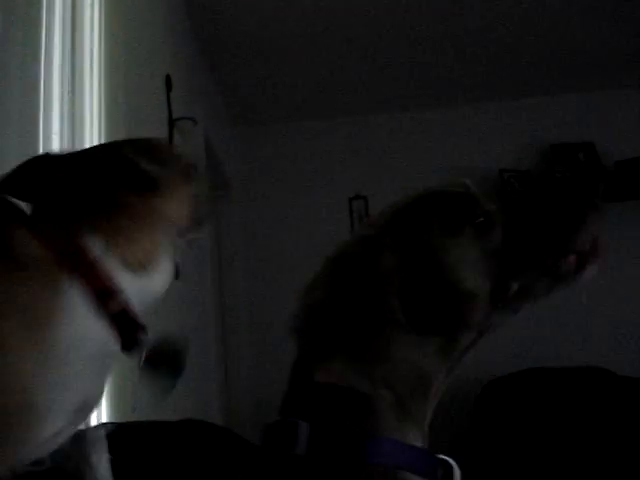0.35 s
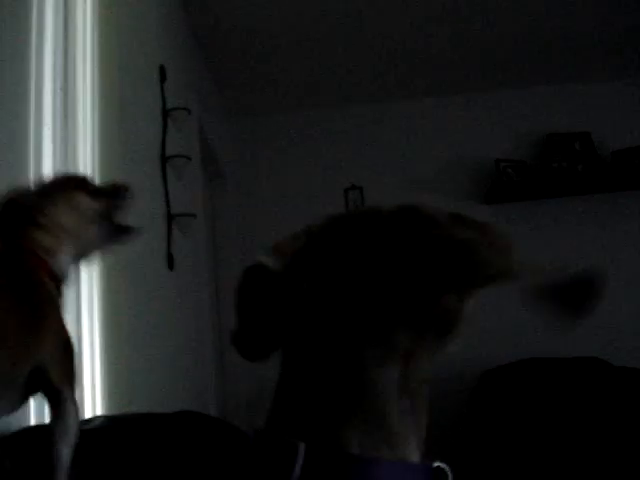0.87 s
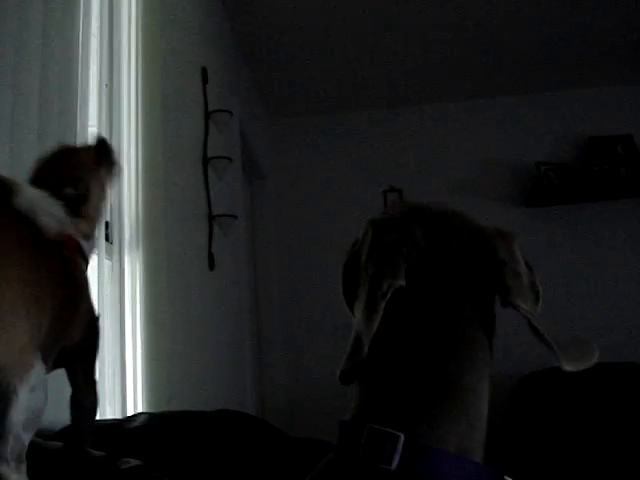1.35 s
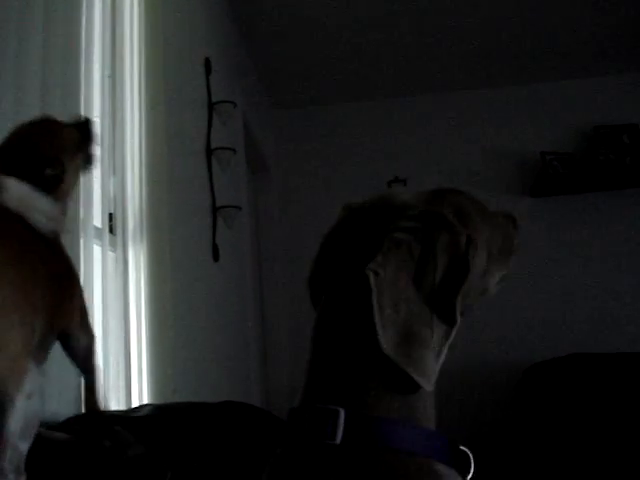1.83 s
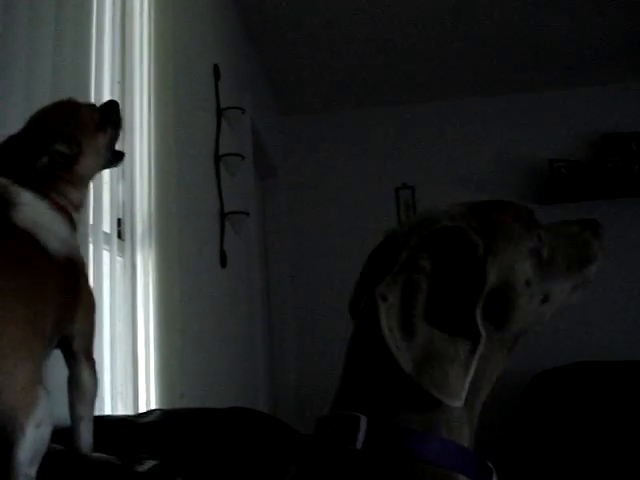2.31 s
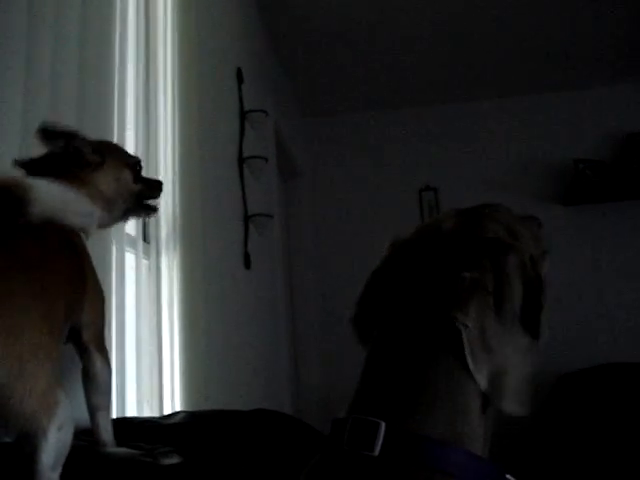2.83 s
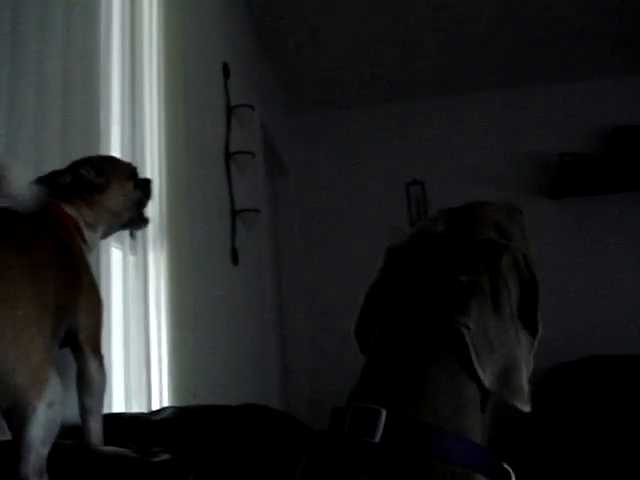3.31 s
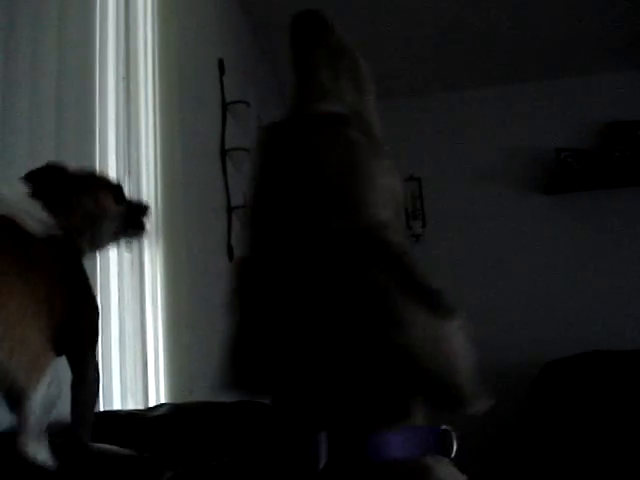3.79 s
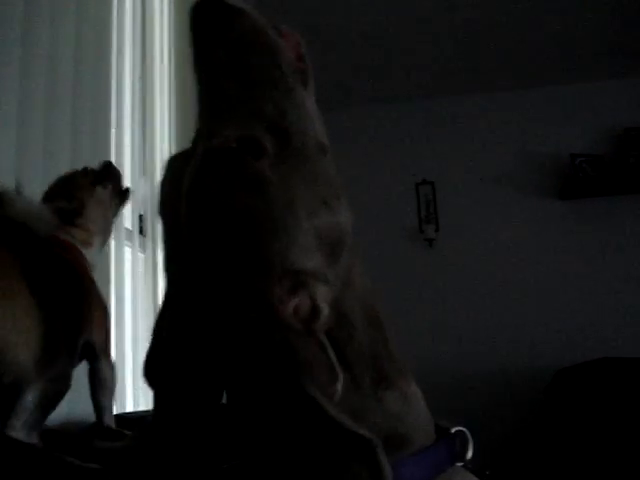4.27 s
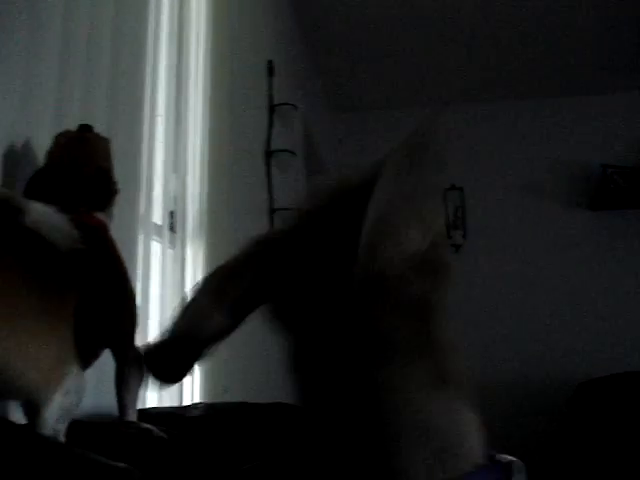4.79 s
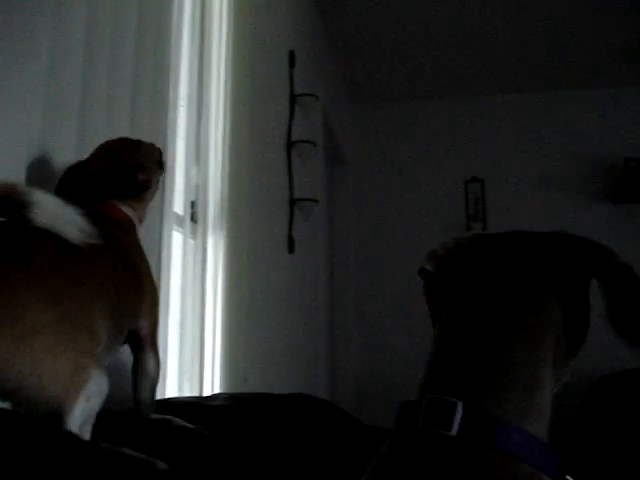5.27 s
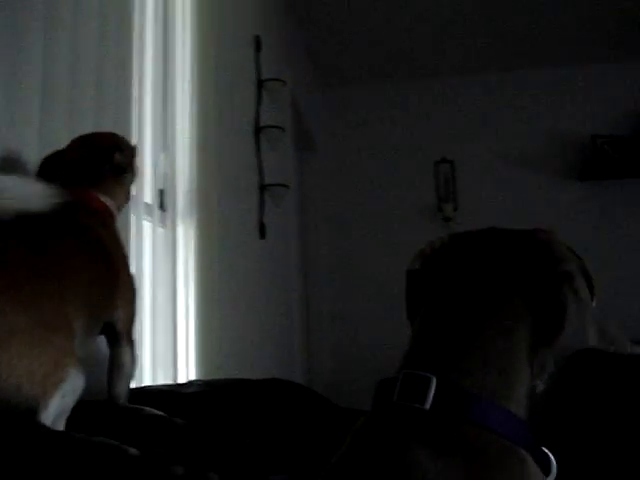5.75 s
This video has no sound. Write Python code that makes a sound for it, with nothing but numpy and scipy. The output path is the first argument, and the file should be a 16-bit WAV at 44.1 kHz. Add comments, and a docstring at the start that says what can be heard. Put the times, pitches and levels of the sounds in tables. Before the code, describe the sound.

Excited dogs indoors, close to a small device with little bass and a crunchy overload. Piercing yips and sliding whines run throughout; hoarse mid-pitched barks come between them, with a few faint yelps from another dog. A wavering howl rises, holds and drops, leaving falling whines and a late short bark over room echo.

```python
"""In a ringing room a small dog yips and whines: a nearly pure high tone with fluttering overtones and breath.
A large dog barks in short arches and howls once: a chest tone and throat-shaped overtones over a rasp.
A third dog yelps now and then: an unsteady stack of overtones picked out by its mouth resonance.
Echoes follow them all, and earlier yelps still ring at the start.
A small microphone cuts the bass and overloads, flattening the positive swing most."""
import sys
import numpy as np
from scipy import signal
from scipy.fft import rfft, irfft, next_fast_len
from scipy.io import wavfile
from scipy.ndimage import uniform_filter1d

SR = 44100
rng = np.random.default_rng(int(sys.argv[2]) if len(sys.argv) > 2 else 0)


def unload_audio(sound):
    """Save the sound as a 16-bit wav file, at the path given as the first command line argument."""
    columns = np.transpose(np.atleast_2d(sound))
    # keep every value between -1 and 1, then stretch to whole-number steps
    steps = np.round(np.clip(columns, -1, 1) * 32767)
    wavfile.write(sys.argv[1], SR, steps.astype(np.int16))


def linear_from_db(decibels):
    """Turn decibels (scalar or array-like) into linear amplitude factors; 0 gives 1."""
    return 10 ** (np.asarray(decibels, float) / 20)


N = 259308

# small dog, one list a call: time_s, pitch_hz, fundamental_level_db
SMALL_CALLS = [
    [(.054, 1000, -9), (.085, 1442, -11.5), (.115, 1563, -16.5), (.138, 1130, -5), (.175, 945.6, -44),
     (.25, 985, -7.5), (.278, 1055, -38.5), (.315, 1060, -8.5), (.345, 1108, -25), (.415, 815, -24.5)],
    [(.65, 806.4, -17.5), (.682, 1476, -10), (.72, 1450, -15), (.73, 1076, -5.5), (.92, 1000, -8.5),
     (.985, 989, -23.5), (1.04, 1018, -16.5), (1.1, 875, -21)],
    [(1.185, 786, -29), (1.22, 1088, -20.5), (1.228, 1190, -7.5), (1.29, 1135, -11.5), (1.35, 1056, -12.5),
     (1.39, 948, -15.5), (1.43, 880, -11)],
    [(1.69, 799.5, -40), (1.74, 937, -2.5), (1.8, 1007, -26.5), (1.845, 1057, -2), (1.905, 1003, -14.5),
     (1.97, 1032, -14), (2.03, 927.5, -8.5), (2.1, 890.5, -45)],
    [(2.11, 889.6, -13.5), (2.14, 918, -15), (2.32, 893.4, -16.5), (2.41, 909, -19.5), (2.47, 974, -10),
     (2.59, 943.4, -22), (2.63, 868, -19), (2.69, 897.6, -8.5), (2.745, 909, -35), (2.78, 1003, -29.5),
     (2.84, 980, -13), (2.93, 975, -34.5)],
    [(3.097, 590.5, -34), (3.125, 1092, -9.5), (3.19, 1059, -1), (3.25, 984, -19), (3.32, 929.3, -3),
     (3.47, 943.8, -13.5), (3.53, 993.3, -18), (3.585, 916, -14)],
    [(3.57, 911.7, -10.5), (3.603, 910, -20.5), (3.612, 1024, -24.5), (3.636, 1034, -40),
     (3.646, 1126, -12), (3.72, 1080, -11.5), (3.81, 1057, -18), (3.85, 998, -16.5), (3.98, 938, -38)],
    [(4.148, 873, -14), (4.17, 995.7, -21), (4.215, 1029, -13), (4.3, 985, -8.5), (4.36, 888, -17.5),
     (4.6, 819, -19), (4.84, 766.2, -18), (4.9, 773, -45.5)],
    [(5.058, 640, -11.5), (5.076, 843, -19), (5.096, 1042, -6), (5.17, 1040, -10.5), (5.3, 921, -8),
     (5.46, 849.5, -19.5), (5.69, 796.7, -4.5), (5.75, 832, -19.5), (5.83, 752.4, -45.5), (5.88, 830, -35)],
]
# small dog, each row holds until the next: start_s, overtone_level_db, overtone_fade_db_per_s,
# hoarseness_db, mouth_resonance_hz, mouth_lift_db
SYLLABLES = [(0.051, -17, 7, -6, 2260, 9), (0.133, -15.5, 23.5, -18.5, 3850, 6.5),
             (0.248, -15.5, 17.5, -14.5, 2507, 10), (.65, -18.5, 7.5, -7.5, 3130, 6.5),
             (0.727, -16, 15.5, -24, 3024, 6.5), (1.182, -16.5, 36.5, -7, 3602, 3.5),
             (1.689, -24, 42.5, -7.5, 3368, -17.5), (2.11, -39, 28.5, -12.5, 1979, 29.5),
             (2.39, -26.5, 53.5, -10, 2900, 11.5), (2.745, -24.5, 26, -13.5, 3940, 13.5),
             (3.1, -14.5, 79.5, -21, 3124, 6.5), (3.49, -36, 21, -12.5, 2927, 18),
             (3.573, -33, 12, -20.5, 1830, 22), (3.615, -32.5, 86.5, -10, 2170, 22.5),
             (3.771, -27, 5.5, -6.5, 3110, 13.5), (3.831, -31.5, 23, -12, 2052, 12.5),
             (4.148, -19.5, 109.5, -8.5, 2957, 11.5), (4.453, -59.5, -0.5, -15, 1591, 28.5),
             (5.061, -14.5, 117, -13, 3497, 10), (5.122, -33, 24, -11, 2600, 0.5),
             (5.785, -39.5, 29, -4, 2306, 18.5), (5.835, -34, 11, -6.5, 1586, 20.5)]
# small dog's throat: frequency_hz, gain_db
SMALL_THROAT = [(400, -19.5), (1000, 10.5), (2000, -3.5), (3000, -12), (4200, -15), (5500, -27),
                (7500, -52.5), (10000, -42)]
# large dog, single barks: crest_s, fall_s, crest_pitch_hz, effort_db, chest_tone_db
LARGE_BARKS = [(0.361, .067, 444, -18.5, -30), (3.505, .115, 498.2, -10.5, -4.5),
               (5.91, .05, 423.3, -13.5, -9.5)]
# large dog, barks strung on one voice that sinks to a groan between crests:
# time_s, pitch_hz, effort_db, chest_tone_db
BARK_STRING = [(.95, 250, -39.5, -49), (.975, 297.2, -23, -50), (1.03, 473, -16, -29.5),
               (1.065, 481.7, -15.5, -31), (1.115, 269, -26.5, -51.5), (1.17, 260.2, -29, -51.5),
               (1.22, 341.7, -51.5, -37.5), (1.26, 349.5, -30.5, -30), (1.32, 259.6, -36, -50.5),
               (1.41, 299.2, -38, -49.5), (1.46, 461.3, -16, -29), (1.515, 478.4, -14, -27.5),
               (1.575, 301.5, -29, -44.5), (1.61, 228.7, -49.5, -42), (1.66, 237, -32.5, -40.5),
               (1.72, 397.3, -18, -36.5), (1.765, 409.4, -21.5, -38), (1.83, 257.6, -28.5, -48),
               (1.99, 184.8, -53.5, -41), (2.1, 215, -31.5, -40.5), (2.205, 455, -16, -29),
               (2.3, 232.7, -28, -36), (2.39, 260, -38, -50), (2.46, 382.2, -19, -34),
               (2.54, 293.7, -28.5, -55.5), (2.595, 311, -34, -34.5), (2.69, 468.6, -8.5, -14.5),
               (2.73, 462, -15, -23.5), (2.79, 320, -31, -41), (2.9, 189.7, -36.5, -44)]
# large dog's howl: time_s, pitch_hz, effort_db
HOWL = [(3.65, 238.8, -39), (3.74, 432.2, -16), (3.906, 406.6, -22.5), (3.981, 458.8, -9),
        (4.131, 412.8, -15.5), (4.289, 417.2, -17), (4.402, 384, -16.5), (4.53, 367, -13),
        (4.659, 381.2, -14), (4.755, 360.4, -16), (4.779, 253.5, -27.5), (4.879, 129.1, -46.5)]
# large dog's throat: frequency_hz, gain_db
LARGE_THROAT = [(300, -3), (600, -4), (900, 9), (1400, -3), (2200, -18.5), (3500, -44), (5500, -29),
                (7500, -47.5), (10000, -55.5)]
# large dog's breath noise, relative spectrum: frequency_hz, level_db
RASP = [(220, -26), (400, 0.5), (1000, 18), (2200, 4), (3600, -54), (5600, -10), (7200, -23)]
# third dog's yelps: start_s, length_s, pitch_hz, effort_db, mouth_resonance_hz, sag_share
THIRD_YELPS = [(1.911, 0.15, 582.2, -14, 2127, 0.13), (2.508, 0.12, 558, -15.5, 1634, .08),
               (3.711, 0.1, 527.5, -23.5, 2520, .03), (3.83, 0.18, 592, -24, 2290, 0.055)]
# reverberation time of the room: frequency_hz, t60_s
ROOM_T60 = [(500, 0.54), (1500, 0.68), (8000, 0.54)]
# soft furniture and thin walls return little bass: frequency_hz, gain_db
ECHO_COLOUR = [(350, -5), (650, -2), (5000, 2)]
# amplifier coupling after the overload, gain relative to the last row: frequency_hz, gain_db
COUPLING = [(8, 10), (120, 4), (420, 3)]
# circuit noise, relative density: frequency_hz, level_db
HISS = [(15, -0.5), (60, -25.5), (300, -17), (1500, -15), (10000, -32.5)]

BAND_EDGE_HZ = 10050
MOUTH_WIDTH_HZ, SLUR_S = 140, 0.024  # mouth lift halves (in dB) at this offset; syllables blend over SLUR_S
UNDERTONE_DB, MOUTH_AIR_DB = -37.5, -4.5  # re fundamental; re overtones at the mouth resonance
BARK_RISE_S = 0.095
GROAN_DB, GROAN_FROM_SHARE = -37.5, 0.7  # low groan over the last share of a bark's fall
LIPS_ROUND_S, CHEST_OPEN_DB, CHEST_ROUND_DB = 3.96, -9.5, -4.5  # howl's chest tone re effort, before and after
TURN_S = 0.02985  # large dog's pitch rounds its corners over this time
CHEST_SLIDE_DB = 0.5  # chest tone lost per unit of pitch slide (log pitch per s)
YELP_FADE_DB = 9
LIMIT_DB, LIMIT_S, TURN_DOWN_DB_PER_DB = -9, 0.0029, 2.0 - 1 / 4.3


def evened(x):
    """Scales to unit rms."""
    return x / np.sqrt(np.mean(abs(x) ** 2) + 1e-20)


def read(points, hz):
    """Interpolates a table over log frequency."""
    point_hz, value = np.transpose(points)
    return np.interp(np.log(hz + 1), np.log(point_hz + 1), value)


def coloured(x, points):
    """Filters x by a spectrum in dB."""
    size = next_fast_len(len(x))
    gain_db = read(points, np.fft.rfftfreq(size, 1 / SR))
    return irfft(rfft(x, size) * linear_from_db(gain_db), size)[:len(x)]


def drift(hz):
    """Unit-rms chance movement, up to about hz."""
    return evened(signal.lfilter(*signal.butter(2, hz, fs=SR), rng.standard_normal(N)))


def controls(calls, rise_s, fall_s):
    """Joins the tables into columns over time, with a gate that is open during each call."""
    t = np.arange(N) / SR
    rows = sorted(tuple(row) for call in calls for row in call)
    row_s, *columns = np.transpose(rows)
    gate = 0
    for call in calls:
        start_s, end_s = call[0][0], call[-1][0]
        gate = gate + np.clip(np.minimum((t - start_s) / rise_s, (end_s - t) / fall_s), 0, 1)
    return np.minimum(gate, 1), *(np.interp(t, row_s, column) for column in columns)


def earlier_call():
    """The room still rings from yelps that ended just before: throat-coloured noise dying away."""
    t = np.arange(N) / SR
    ring = evened(coloured(rng.standard_normal(N), SMALL_THROAT))
    return linear_from_db(-22.0 - 60 * t / 0.3) * ring


def syllables():
    """Overtone level, hoarseness, mouth resonance and its lift over time, as the mouth changes shape."""
    t = np.arange(N) / SR
    row = np.maximum(np.searchsorted(np.transpose(SYLLABLES)[0], t) - 1, 0)
    start_s, top_db, fade_db_per_s, *rest = np.array(SYLLABLES)[row].T
    faded_db = top_db - fade_db_per_s * (t - start_s)
    return (uniform_filter1d(column, round(SLUR_S * SR)) for column in (faded_db, *rest))


def small_dog():
    """A nearly pure whine with fluttering overtones; half-way lines when hoarse; a little breath."""
    gate, hz, effort_db = controls(SMALL_CALLS, rise_s=0.014, fall_s=0.016)
    top_db, hoarse_db, mouth_hz, mouth_db = syllables()
    glide_db = np.clip(np.gradient(hz) * SR / 1200, 0, 13)  # the folds leak air while the pitch leaps up
    bright_db = top_db - effort_db
    jitter = (0.0025 + 0.011 * linear_from_db(hoarse_db)) * drift(hz=90)
    phase = 2 * np.pi * np.cumsum(hz * (1 + jitter)) / SR
    voice = np.cos(phase) + linear_from_db(UNDERTONE_DB) * drift(hz=40.4) * np.cos(phase / 2)
    for k in np.arange(3, 21) / 2:
        ring_db = mouth_db / (1 + ((k * hz - mouth_hz) / MOUTH_WIDTH_HZ) ** 2)
        line_db = bright_db + read(SMALL_THROAT, k * hz) + ring_db + hoarse_db * (k % 1 > 0)
        flutter = linear_from_db(4 * drift(hz=18)) * (1 + 0.38 * drift(hz=70))
        voice += linear_from_db(line_db) * (k * hz < BAND_EDGE_HZ) * flutter * np.cos(k * phase + k * k)
    pulsed_noise = rng.standard_normal(N) * (1 + 0.27 * np.cos(phase))
    breath = evened(coloured(pulsed_noise, SMALL_THROAT))
    voice += linear_from_db(-9.5 + bright_db + 0.4 * hoarse_db + glide_db) * breath
    mouth_air = drift(hz=MOUTH_WIDTH_HZ) * np.cos(2 * np.pi * np.cumsum(mouth_hz) / SR)
    air_db = MOUTH_AIR_DB + bright_db + read(SMALL_THROAT, mouth_hz) + mouth_db + 0.5 * hoarse_db
    voice += linear_from_db(air_db) * mouth_air
    return np.sqrt(2) * gate * linear_from_db(effort_db) * voice


def room(x):
    """Sparse echoes of random sign, one in every 20 samples, each band dying at its own speed."""
    slots = np.arange(200, SR - 20, 20)
    taps = np.zeros(SR)
    taps[slots + rng.integers(0, 20, len(slots))] = rng.choice([-1., 1.], len(slots))
    hz, t, bands = signal.stft(taps, SR, nperseg=256)
    decay = linear_from_db(-60 * t / read(ROOM_T60, hz)[:, None])
    tail = signal.istft(bands * decay, SR, nperseg=256)[1]
    return signal.fftconvolve(x, tail / np.linalg.norm(tail))[:N]


def bark(crest_s, fall_s, hz, effort_db, chest_db):
    """Pitch and level rise to a rounded crest and fall away; the chest tone ends in a groan."""
    u = np.linspace(-1, 1, num=11)
    time_s = crest_s + u * np.where(u < 0, BARK_RISE_S, fall_s)
    pitch_hz = hz * (1 - 0.52 * abs(u) ** 1.6)
    level_db = effort_db - 22 * abs(u) ** 1.7
    tone_db = np.where(u > GROAN_FROM_SHARE, GROAN_DB, chest_db - 30 * abs(u) ** 0.46)
    return np.transpose([time_s, pitch_hz, level_db, tone_db])


def howl():
    """The long call: its chest tone follows the effort, more strongly once the lips round."""
    return [(s, hz, db, db + (CHEST_OPEN_DB if s < LIPS_ROUND_S else CHEST_ROUND_DB)) for s, hz, db in HOWL]


def large_dog():
    """Chest tone and throat-shaped overtones over a rasp; held notes are clear, leaping ones rough."""
    calls = [bark(*row) for row in LARGE_BARKS] + [BARK_STRING, howl()]
    gate, hz, effort_db, chest_db = controls(calls, rise_s=0.0068, fall_s=0.005)
    hz = uniform_filter1d(hz, round(TURN_S * SR))
    slide = abs(np.gradient(np.log(hz))) * SR
    leap = np.minimum(uniform_filter1d(slide, size=4000), 3)
    jitter = 0.002 * (0.5 + leap) * drift(hz=80)
    phase = 2 * np.pi * np.cumsum(hz * (1 + jitter)) / SR
    # rounded lips favour the chest tone and dull the top
    rounded_db = np.clip(chest_db - effort_db + 11, 0, 25)
    voice = np.cos(2 * phase)
    for k in range(3, 21):
        flutter = linear_from_db(0.3 * k * drift(hz=5)) * (1 + (0.25 + 0.1 * leap) * drift(hz=57))
        line_db = read(LARGE_THROAT, k * hz) - 2.16 * rounded_db
        voice += linear_from_db(line_db) * flutter * np.cos(k * phase + k * k / 3)
    pulsed_noise = rng.standard_normal(N) * (1 + 0.12 * np.cos(phase))
    breath_db = -30 + 7 * leap - 1.2 * rounded_db + 0.7 * (effort_db + 20)
    voice += linear_from_db(breath_db) * evened(coloured(pulsed_noise, RASP))
    chest = linear_from_db(chest_db - CHEST_SLIDE_DB * slide) * np.cos(phase)  # sounds best on a held note
    return np.sqrt(2) * gate * (linear_from_db(effort_db) * voice + chest)


def yelp(start_s, length_s, hz, effort_db, mouth_hz, sag_share):
    """Pitch, level and mouth resonance slide evenly down."""
    end_hz, end_mouth_hz = hz * (1 - sag_share), mouth_hz * (1 - sag_share)
    return [(start_s, hz, effort_db, mouth_hz),
            (start_s + length_s, end_hz, effort_db - YELP_FADE_DB, end_mouth_hz)]


def third_dog():
    """An unsteady stack of overtones, strong only near the mouth resonance."""
    calls = [yelp(*row) for row in THIRD_YELPS]
    gate, hz, effort_db, mouth_hz = controls(calls, rise_s=0.003, fall_s=0.01)
    phase = 2 * np.pi * np.cumsum(hz * (1 + 0.01 * drift(hz=90))) / SR
    voice = 0
    for k in range(2, 8):
        resonance = 1 / (1 + ((k * hz - mouth_hz) / 450) ** 2) ** 2
        voice = voice + np.cos(k * phase + k * k) * resonance
    return np.sqrt(2) * gate * linear_from_db(effort_db) * voice


def scene():
    """Sums dogs and echoes; the large dog has its own echo pattern, the other two share one."""
    small, large = small_dog() + third_dog(), large_dog()
    echoes = linear_from_db(-3.5) * room(small) + linear_from_db(-1) * room(large)
    return (small + large + coloured(echoes, ECHO_COLOUR) + earlier_call())[None]


def levelled(x):
    """Quick gain control: turns down what rises over the limit, following the short-time power."""
    window = round(LIMIT_S * SR)
    power_db = 10 * np.log10(abs(uniform_filter1d(x ** 2, window)) + 1e-12)
    excess_db = uniform_filter1d(np.maximum(power_db - LIMIT_DB, 0), window)
    return x / linear_from_db(excess_db * TURN_DOWN_DB_PER_DB)


def overloaded(x):
    """Soft saturation above a knee, with less headroom on the positive swing."""
    knee, headroom = 0.34, np.where(x > 0, 0.14, 0.45)
    over = np.maximum(abs(x) - knee, 0)
    return x - np.sign(x) * (over - headroom * np.tanh(over / headroom))


def top_cut(x):
    """Nothing passes above the cut-off."""
    return signal.sosfilt(signal.butter(12, 10080, fs=SR, output="sos"), x)


def record(dry):
    """Capsule bass cut, gain control, lopsided overload, coupling filter, circuit noise, band limit."""
    bass_cut = signal.butter(3, 300, "high", fs=SR, output="sos")
    capsule = levelled(linear_from_db(-3.5) * signal.sosfilt(bass_cut, dry))
    squashed = overloaded(capsule)
    hiss = linear_from_db(-50.5) * evened(coloured(rng.standard_normal(N), HISS))
    coupled = coloured(squashed[0], COUPLING)[None] / linear_from_db(COUPLING[-1][1]) + hiss
    low_pass = signal.firwin(511, BAND_EDGE_HZ, window=("kaiser", 9), fs=SR)
    limited = signal.oaconvolve(coupled, low_pass[None], "same")
    return top_cut(limited)


dry = scene()
out = record(dry)
unload_audio(out)
```